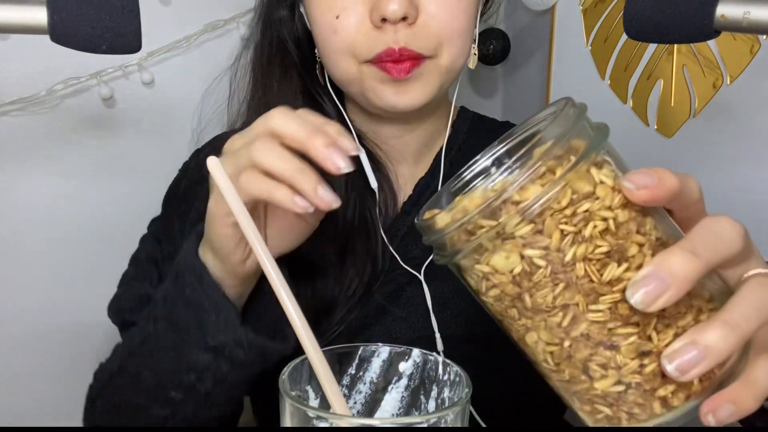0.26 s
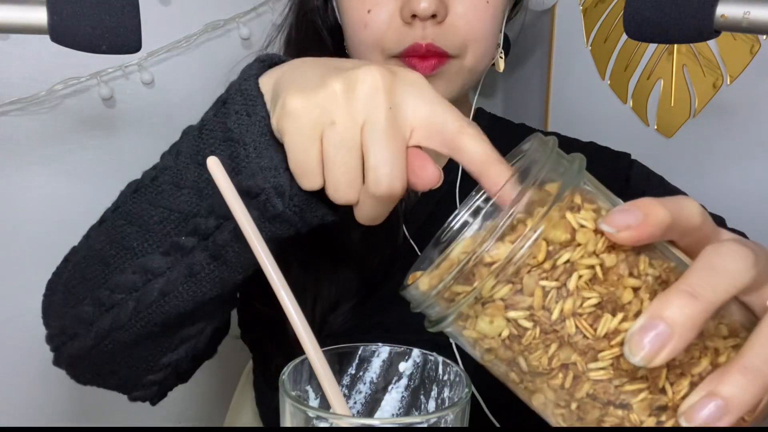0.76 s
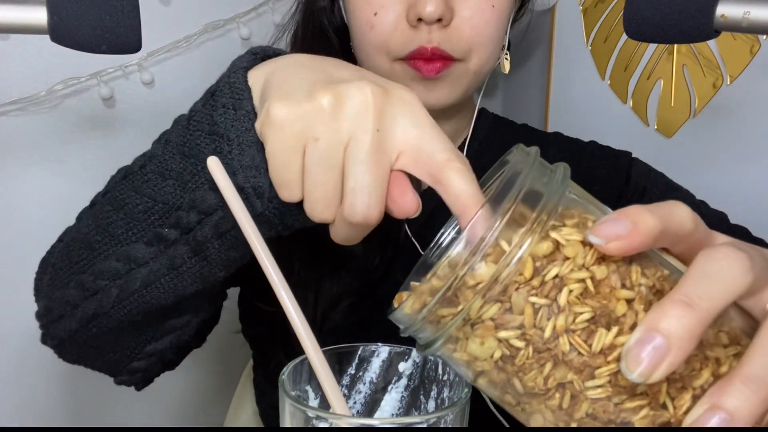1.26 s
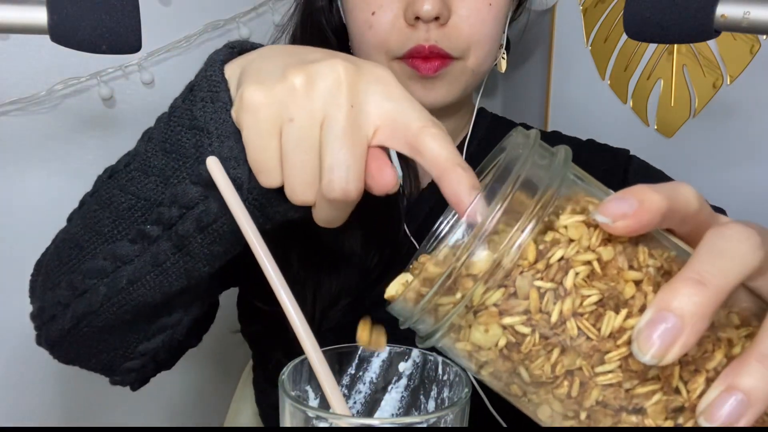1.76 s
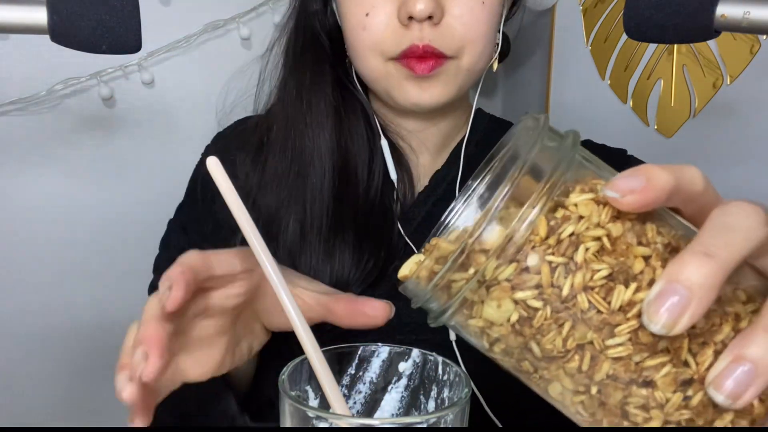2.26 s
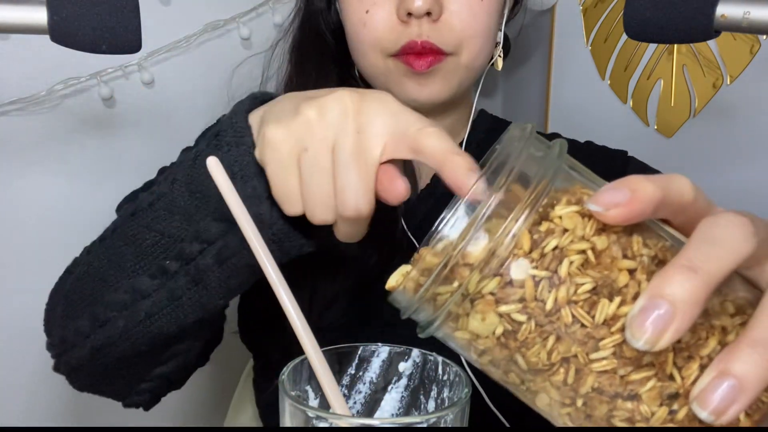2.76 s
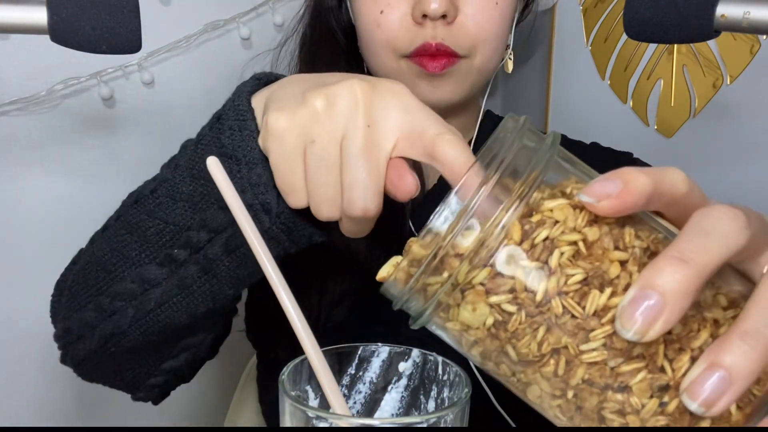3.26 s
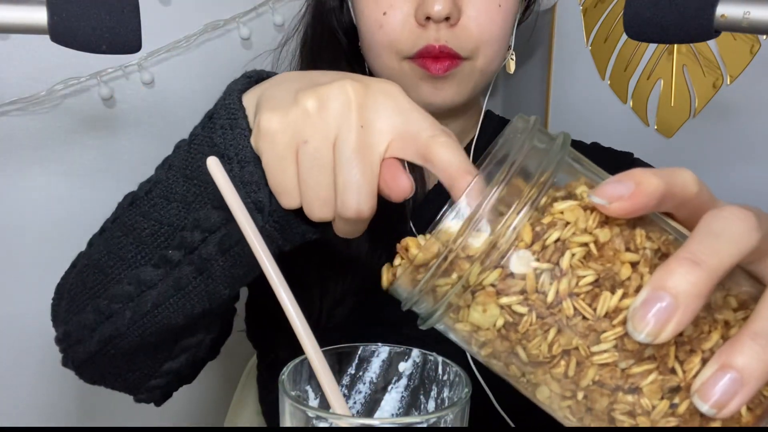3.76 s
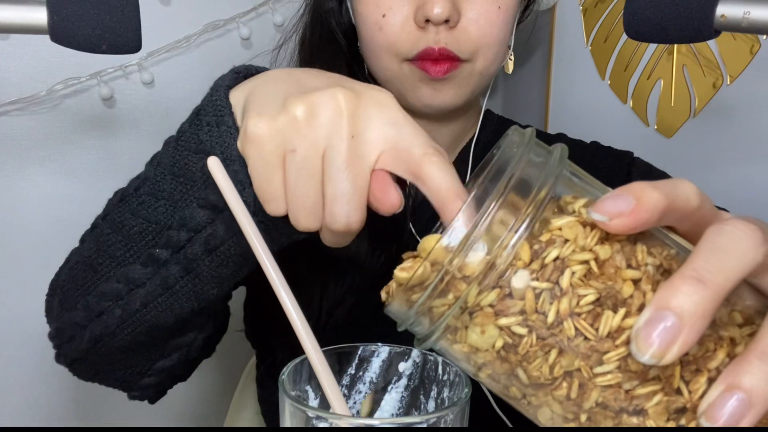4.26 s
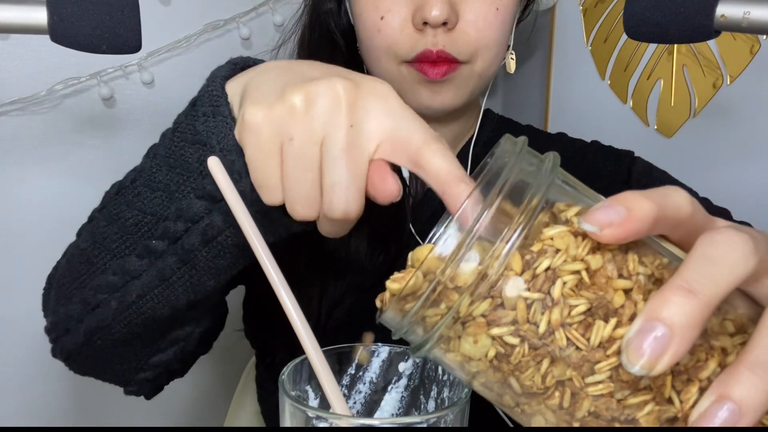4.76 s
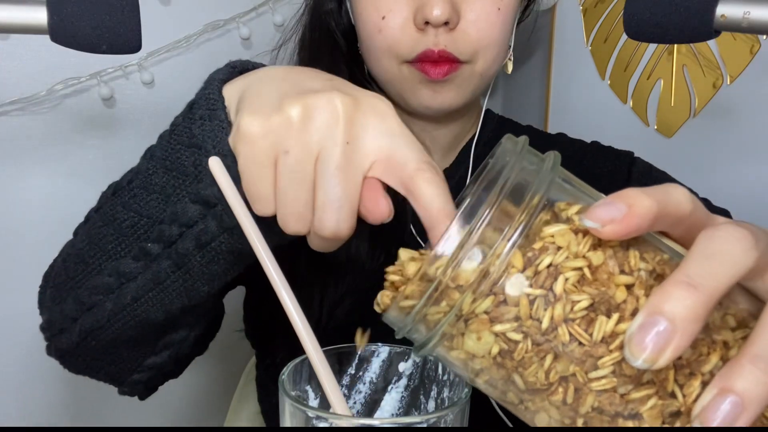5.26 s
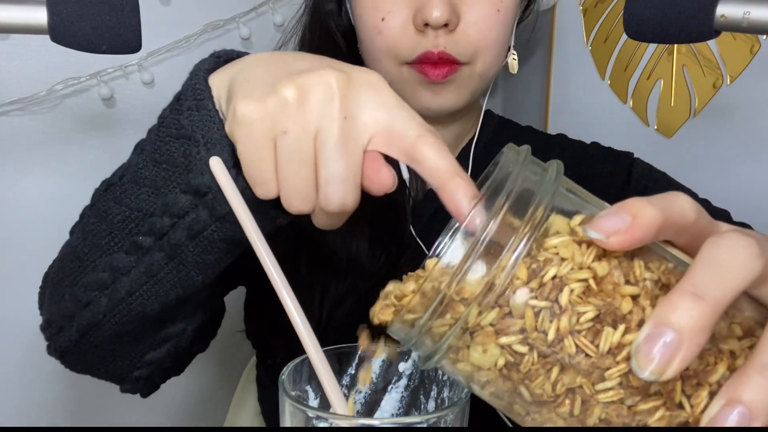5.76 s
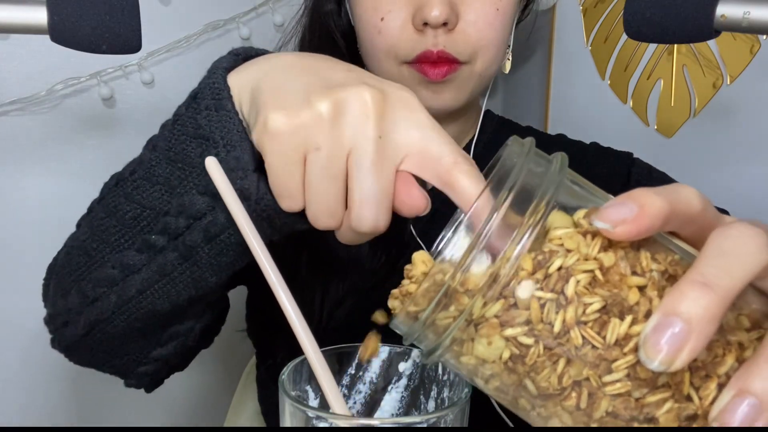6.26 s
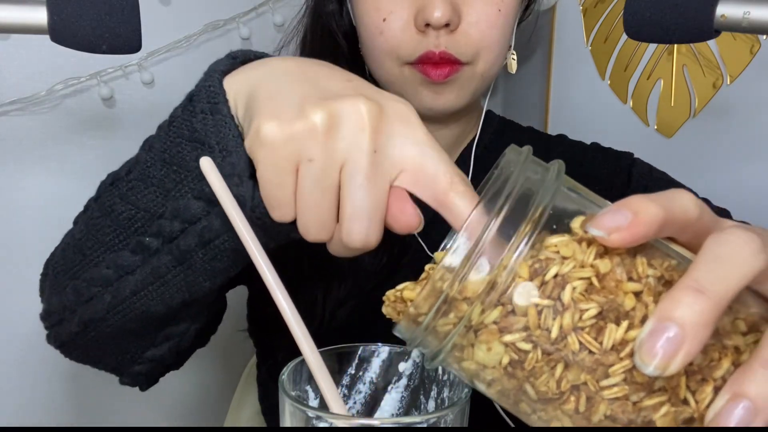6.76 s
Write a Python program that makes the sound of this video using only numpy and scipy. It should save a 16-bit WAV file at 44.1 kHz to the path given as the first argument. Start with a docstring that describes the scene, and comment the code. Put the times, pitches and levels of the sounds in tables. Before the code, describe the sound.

Close, quiet granola raking: soft swishes and a sudden table thud, then thickening crackly crunch and glassy clinks as kernels spill into a tumbler.

```python
"""Raking granola from a jar into a tumbler

A finger rakes granola out of a tilted glass jar into a thick tumbler, close to a pair of microphones.
Shaped noise and tiny pings make the rubbing kernels; hollow noise makes the jar mouth and swishing sleeve.
Decaying tones make the clinks in the tumbler; short bursts make the crunches and ticks.
Clusters thud as wavering table tones with a crack, the hardest overloading the input.
Filtered noise makes the room's rumble, hiss and slow puffs of air."""
import sys
import numpy as np
from scipy import signal
from scipy.fft import rfft, irfft, next_fast_len
from scipy.io import wavfile
from scipy.ndimage import uniform_filter1d

SR = 44100
rng = np.random.default_rng(int(sys.argv[2]) if len(sys.argv) > 2 else 0)


def materialize(psi):
    """Save the field psi as 16-bit PCM at rate SR to the path in sys.argv[1].

    A 1-D psi becomes a single channel; in a 2-D psi each row is a channel.
    """
    bounded = np.clip(np.atleast_2d(psi).T, -1, 1)
    quanta = np.round(bounded * 32767).astype(np.int16)
    wavfile.write(sys.argv[1], SR, quanta)


def volts(x):
    """Linear amplitude factor 10**(x/20) for a level x in dB, scalar or array-like."""
    e = np.asarray(x, float) / 20
    return 10 ** e


N = 308700  # length in samples: 7 seconds

# Ringing tones of the tumbler, with levels relative to each other.
# t60_s is the time to fade by 60 dB; mode_group (rounded) is 0 second, 1 first, 2 third, 3 or -1 top.
# Columns: pitch_hz, level_db, t60_s, mode_group, left_right_db, left_lead_rad
TUMBLER = [(2055, 0.5, 0.15, 1, 5.5, 0.92), (4904, 2.5, 0.043, 0, 5.5, 0.8),
           (4700, -14.5, 0.089, 1.5, 0.5, 1.95), (8640, 8, 0.052, 2, 1.5, 2.52),
           (10366, 5.5, 0.028, 3, -1, 1.2), (11680, -2, 0.033, 3, -2.5, 1.3),
           (12000, -6, 0.018, 3, -9, 0.92), (13400, -6.5, 0.024, 3, -6.5, 1.7),
           (14900, -14.5, .02, 3, -4.5, 1.3), (2055, -13, 0.27, 1, 3.5, 1.4),
           (1779, -2.5, 0.03, 2.5, -2.5, 0.71), (3720, -30, 0.083, -1, -4.5, 2.2),
           (6100, -12, 0.072, 2, 0.5, 1.2), (8000, -6.5, 0.04, 2, -1.5, 1.2)]

# Strokes of finger and sleeve, with relative levels; middle_db is added to rustle_db for its middle pitches.
# Columns: full_strength_s, held_s, rustle_db, middle_db, hollow_db
STROKES = [(.1, 0.14, -67.5, -7, -55.5), (.62, 0.037, -73, -3, -46), (.69, 0.17, -58.5, -1.5, -44.5),
           (.97, .04, -56.5, -4, -43.5), (1.06, 0.18, -55, -2.5, -45), (1.31, 0.021, -55, 0, -46),
           (1.484, 0.039, -57, 8, -45.5), (1.66, .01, -68.5, 0, -53.5), (1.88, .01, -66.5, -10.5, -62.5),
           (2.073, .03, -63, 4.5, -33), (2.53, 0.11, -74.5, 2.5, -57), (2.867, 0.044, -58, -2.5, -46.5),
           (2.974, .01, -61.5, -2.5, -50.5), (3.17, 0.029, -55.5, 1.5, -43),
           (3.382, 0.032, -55.5, 2, -43.5), (3.46, 0.02, -64, 9, -63), (3.592, 0.0166, -53.5, -0.5, -41.5),
           (3.706, .01, -42.5, -7, -48), (3.891, .055, -54, -3.5, -43.5), (4.141, .01, -57, 10, -40),
           (4.21, 0.035, -44.5, -0.5, -46), (4.33, .02, -60, -7, -53.5), (4.46, 0.07, -45, .1, -42),
           (4.701, .01, -57, -2, -68), (4.82, 0.049, -48, -3.5, -46), (5.031, .01, -61, 11, -38),
           (5.085, 0.12, -41, -7, -42), (5.29, 0.093, -48.5, -5, -54), (5.475, 0.024, -35, -1.5, -36.5),
           (5.579, 0.039, -47.5, -2.5, -51), (5.815, 0.076, -37.5, -2, -42.5), (5.95, 0.034, -49, 1, -42.5),
           (6.11, 0.025, -37, -5, -43.5), (6.258, 0.13, -36.5, -1, -41), (6.53, 0.028, -39, 0.7, -56),
           (6.62, 0.043, -39, -4.5, -45), (6.789, .01, -51.5, 4.5, -42.5), (6.86, 0.0058, -43, 1, -53),
           (6.99, .01, -29, -6, -44)]


def unit(x):
    """Scale a sound to an average strength (rms) of 1."""
    return x / np.sqrt(np.mean(x ** 2) + 1e-20)


def along(points, hz):
    """Read a curve of (Hz, value) points, with frequency on a log axis."""
    point_hz, value = np.transpose(points)
    return np.interp(np.log(hz + 1), np.log(point_hz + 1), value)


def filtered(x, response):
    """Change the strength and timing of each frequency by a response function."""
    length = next_fast_len(x.shape[-1] + 8192)  # spare room so the end does not wrap to the start
    spectrum = rfft(x, length) * response(np.fft.rfftfreq(length, 1 / SR))
    return irfft(spectrum, length)[..., :N]


def peak(f, hz, width_hz):
    """The response of one resonance, which rings on after it is struck."""
    return 1j * f * width_hz / (hz * hz - f * f + 1j * f * width_hz)


def pair(a, b, alike, spectrum):
    """Colour two noises and mix them to stereo of rms 1, with a chosen left-right likeness."""
    def response(hz):
        turn = np.arccos(np.clip(along(alike, hz), -1, 1)) / 2
        return volts(along(spectrum, hz)) * [np.cos(turn), np.sin(turn)]

    mid, side = filtered(np.array([a, b]), response)
    return unit(np.array([mid + side, mid - side]))


def spaced(x):
    """Delay the left side: its capsule is a little further from the jar."""
    lag = 7  # samples
    return np.array([np.pad(x[0], (lag, 0))[:N], x[1]])


def add(out, s, sound):
    """Mix a short sound in at time s, in seconds."""
    start = round(s * SR)
    out[..., start:start + sound.shape[-1]] += sound


def rake():
    """Kernels rub in dense uneven grains and stir the glass; jar mouth and sleeve sound hollow."""
    # Rustle colour: pitch_hz, level_db (per Hz)
    rustle_colour = [(500, -29), (800, -13.5), (1150, 0.5), (1500, -7), (2200, -2), (3000, -1.5),
                     (4500, -2.5), (7000, -3.5), (10000, -4), (13000, -10), (15500, -16.5)]
    # Jar mouth and sleeve colour: pitch_hz, level_db (per Hz)
    hollow_colour = [(120, -26.5), (200, -15.5), (285, -0.5), (380, -4.5), (490, 1), (600, -5),
                     (800, -14.5), (1500, -20.5), (3000, -28), (5000, -48.5)]
    rustle_db, middle_db, hollow_db = raking()
    busy = np.clip((rustle_db + 60.5) / 16, 0, 1)  # harder raking breaks into separate crackles

    slow_noise = unit(uniform_filter1d(rng.standard_normal(N), size=120))
    clumps = volts((2.5 + 1.7 * busy) * slow_noise)
    grains = volts(0.61 * rng.exponential(size=(2, N))) * rng.standard_normal((2, N))
    grains = pair(*grains, [(1000, 0.25), (8000, 0.08)], rustle_colour)
    rustle = clumps * grains * volts(rustle_db + 10 - 3.8 * busy)
    middle = filtered(rustle, lambda f: 1 / (1 + (f / 4400) ** 6))
    rustle = rustle + middle * (volts(middle_db) - 1)

    def glass(f):
        tumbler = sum(volts(3.5) * peak(f, hz, 0.82 / t60) for hz, _, t60, *_ in TUMBLER)
        jar = volts(5) * peak(f, 2236, 140)
        return tumbler + jar

    stirred = filtered(rustle, glass)
    crackles = crackle(rustle_db - 7 + 8 * busy)
    hollow = pair(*rng.standard_normal((2, N)), [(300, 0.69)], hollow_colour) * volts(hollow_db)
    return spaced(rustle + stirred + crackles) + hollow * volts([[1.2], [-1.2]])  # hollow leans left


def raking():
    """Level curves of the rustle, of its middle above that, and of the hollow sound."""
    rustle, middle, hollow = np.transpose(STROKES)[2:]
    rule = dict(rise_s=0.068, fall_db_per_s=152, rest_db=-73)
    rustle_db = strokes(rustle, **rule)
    middle_db = strokes(rustle + middle, **rule) - rustle_db
    hollow_db = strokes(hollow, rise_s=0.085, fall_db_per_s=189, rest_db=-63.5)
    return rustle_db, middle_db, hollow_db


def strokes(level_db, rise_s, fall_db_per_s, rest_db):
    """Level in dB of strokes that rise, hold and fall, over a faint constant stir."""
    s, held = np.transpose(STROKES)[:2, :, None]
    t = np.arange(0, N, 64) / SR  # a coarse clock is enough
    rise_db_per_s = np.maximum(level_db[:, None] - rest_db, 6) / rise_s
    rise_db = rise_db_per_s * np.maximum(s - t, 0)
    fall_db = fall_db_per_s * np.maximum(t - s - held, 0)
    shape_db = level_db[:, None] - rise_db - fall_db
    total_db = 10 * np.log10(volts(2 * shape_db).sum(0) + volts(2 * rest_db))
    return np.interp(np.arange(N) / SR, t, total_db)


def crackle(level_db, count=1900):
    """Small kernels knock each other: brief pings of random pitch, size and place that follow the raking."""
    t = np.arange(SR // 70) / SR
    when, size, cycles = rng.random((3, count, 1))
    pitch, place = rng.standard_normal((2, count, 1))
    hz = np.clip(4200 * np.exp(.7 * pitch), 1500, 14000)
    start = (when * N).astype(int)
    ping = np.sin(2 * np.pi * hz * t) * np.exp(-t * hz / (3 + 9 * cycles))
    ping = ping * volts(level_db[start] - 3.96 * np.log(size + 0.0013))  # a few are much louder
    where = (start + np.arange(len(t))).ravel()
    sides = []
    for side in (1, -1):
        panned = ping * volts(side * 4.2 * place)
        sides.append(np.bincount(where, panned.ravel(), N + SR)[:N])
    return np.array(sides)


def clinks():
    """Each kernel rings the tumbler's tones in its own mixture; each tone faces the capsules differently."""
    # Kernels landing in the tumbler, with relative levels; the last three are added to second_mode_db.
    # Columns: start_s, second_mode_db, first_mode_db, third_mode_db, top_modes_db
    kernel_landings = [(1.0854, -18.5, 1.5, 0, -12), (1.6424, -50.5, 16, -10.5, -7.5),
                       (3.678, -24.5, -8.5, -13, -0.5), (3.7554, -24.5, -28, -9, -3),
                       (4.1134, -20, -22, -6, -9.5), (4.1215, -23, -11, -32, -28),
                       (4.2064, -30.5, -6, -16, 4), (4.2522, -23.5, -6.5, -21, -6),
                       (4.2814, -25.5, -38, -14, -1.5), (4.364, -20, -30, -12, -4.5),
                       (4.3684, -17, -29, -23, -11), (4.4064, -28, -24.5, -5, 0.5),
                       (4.4453, -20.5, -18, -4, -1.5), (4.4717, -14, -35, -26, -10),
                       (4.5204, -30, -26, -12, 10), (4.5301, -19, -25, -18, -15),
                       (4.5655, -26, -23, -22, -11), (4.5864, -29, -19, -5, 5.5),
                       (4.6438, -40, -20, -3, 15.5), (4.6887, -28.5, -15.5, -8, -6),
                       (4.7032, -21.5, -33, -8, -4.5), (5.005, -4, -6, -41, -33),
                       (5.0314, -31.5, 2, -11, -7), (5.0853, -23, 3.5, -5, -3),
                       (5.1557, 2.5, -26.5, -24.5, -31), (5.1624, -5, -27, -10, -20),
                       (5.233, -15.5, -34, -15, -13), (5.2494, -22.5, -14.5, -22, -24),
                       (5.3068, -30.5, -10.5, -12, 6.5), (5.4276, -24.5, -36, -5, -5),
                       (5.4445, -17, -27, -8, -15), (5.4584, -5, -33, -28, -27),
                       (5.4615, -1, -29, -21.5, -30), (5.4884, -24.5, -3, -18, -4),
                       (5.5648, -20, -17, -17, -2), (5.6211, -20.5, -32, -28, -14.5),
                       (5.8032, -19.5, -33, -11, -6), (5.8107, -18, -10.5, -21, -3.5),
                       (5.8361, -25, 4.5, -23, -10), (5.8434, -22.5, 2, -23, -13),
                       (5.8534, -19.5, -14, -10, -9), (5.8694, -24, 5, -14, -7),
                       (5.884, -16, -18.5, -20, -8), (5.9004, -21, -31, -9, -3),
                       (5.9104, -24.5, -5, -14, -1), (5.9499, -38, 3, -1, 16),
                       (6.0611, -15, -21.5, -14, -7.5), (6.0651, -12, -44, -15, -23),
                       (6.0866, -18, -16, -10, -13), (6.1379, -23.5, -7.5, -3.5, -2),
                       (6.1988, -21, -12, -8, -5), (6.2312, -8, -30, -11.5, -25),
                       (6.2544, -18.5, -7, -14, 6), (6.2851, -22, -29, -25, -5), (6.3355, -29, -23, 0, -7),
                       (6.3594, -40.5, -4, -6, 17.5), (6.4288, -31.5, -10.5, -4.5, -8),
                       (6.4976, -22.5, -11, -5, -14.5), (6.6139, -28, -3, -14, -7),
                       (6.6388, -32, -6, -7, 11), (6.9331, -23.5, -28, -20, -7),
                       (6.9556, -19.5, -18, -5, -12), (6.9764, -26.5, -13, 2, 1)]
    out, t = np.zeros((2, N + SR)), np.arange(SR // 5) / SR
    hz, mode_db, t60, group, pan_db, lead = np.transpose(TUMBLER)
    group = np.round(group).astype(int)
    side = np.array([.5, -.5])[:, None, None]  # half of each left-right difference per side
    # weak modes depend most on where the kernel lands
    scatter_db = np.minimum(1.2 + 0.52 * np.abs(mode_db), 6)
    landings = [*kernel_landings, *spill()]
    luck = rng.standard_normal((len(landings), 2 * len(hz)))
    for (s, db, *above), chance in zip(landings, luck):
        level_luck, phase_luck = np.split(chance, 2)
        group_db = np.array([0, *above])[group]
        level_db = db + group_db + mode_db + scatter_db * level_luck + 0.5
        turn = 2 * np.pi * hz[:, None] * t + side * (lead + 0.39 * phase_luck)[:, None]
        fade_db = level_db[:, None] + side * pan_db[:, None] - 60 * t / t60[:, None]
        ring = volts(fade_db) * np.sin(turn)
        add(out, s, ring.sum(1) * (1 - np.exp(-t / 0.00086)))  # a very quick, soft start
    return out[:, :N]


def spill(count=40):
    """Once the jar pours, stray kernels drop into the tumbler at random, their levels following the raking."""
    from_s, above_rustle_db, spread_db = 3.4, 8.5, 6.5
    modes_db = [-9.5, -9, 0]  # first, third and top modes above the second, before scatter
    when = from_s + rng.random(count) * (N / SR - from_s)
    chance = spread_db * rng.standard_normal((count, 4))
    rustle_db = raking()[0][(when * SR).astype(int)]
    level_db = rustle_db + above_rustle_db + chance[:, 0] / 2
    return np.column_stack([when, level_db, modes_db + chance[:, 1:]])


def ticks():
    """A snap is a very short burst, bare and through the jar's body; the piece adds a brief pitched ping."""
    # Kernels snapping and ticking on glass, with relative levels; body and ping are added to treble_db.
    # Columns: start_s, treble_db, body_db, ping_db, ping_hz
    snaps = [(0.082, -47, -17, -12, 2800), (0.149, -37, -17, -11, 3540), (.266, -39, -22, -16.5, 2230),
             (0.597, -50, 16.5, -4, 2120), (1.085, -30.5, 3, 18.5, 2750), (1.3952, -44, -19, 11.5, 2315),
             (1.411, -33, -28, -8, 2270), (1.4572, -43.5, -21, 10, 2160), (1.48, -38, -21, 18, 2270),
             (1.64, -40.5, 9.5, -17, 2320), (1.6596, -38, -3.5, -4, 2370), (1.855, -44, -21, -18, 4200),
             (2.846, -54, -20, -12, 2600), (3.342, -41, -15.5, -9, 2200), (3.5418, -38.5, -20, -8.5, 2170),
             (3.679, -13.5, -2, -1, 2920), (3.8279, -41.5, 1, -12, 2160), (3.9, -28.5, 3, -6, 2690),
             (4.0114, -34.5, 0, -6, 2260), (4.115, -23, -5, -5.5, 3720), (4.1724, -31, -2, -1.5, 2290),
             (4.1952, -37, -8, 14.5, 2920), (4.2103, -30.5, 1.5, -1.5, 2970), (4.2405, -31.5, 2, -5, 3060),
             (4.286, -25, -6, -8, 3680), (4.3156, -27.5, -22, -17, 2290), (4.364, -30, -7, -4.5, 2260),
             (4.4224, -27, -11, -14, 2260), (4.445, -27.5, 2, -15.5, 3870), (4.4692, -27, -16, -11.5, 2280),
             (4.527, -22.5, -13, -10, 2220), (4.6892, -32.5, -5, -15, 2900),
             (4.7044, -22.5, -25, -12.5, 2290), (4.8379, -31, -20, -14, 2260),
             (5.0031, -21.5, 10, 2.5, 2290), (5.032, -35, 18, 3.5, 2190), (5.0665, -27, -1, -4, 3870),
             (5.085, -28, 6, 5, 2320), (5.112, -22, -9, -9.5, 2180), (5.1546, -9.5, -11, -3.5, 3600),
             (5.1612, -6.5, -9.5, -11, 3610), (5.2317, -17, -23, -16, 2270), (5.445, -22.5, -7, -8, 2440),
             (5.4597, -18, 0, 4.5, 2360), (5.4885, -29, -8, 4.5, 2300), (5.5152, -19.5, -19, -14.5, 3000),
             (5.5602, -23, -8, -18, 2230), (5.694, -30, -13, -12, 2150), (5.79, -38, 3, -8, 2180),
             (5.8072, -25.5, -6, -2, 3550), (5.8566, -23.5, -0.5, 1, 2130),
             (5.9095, -18.5, -24, -16.5, 2280), (5.9563, -25, -21, -14, 2160),
             (6.0606, -15, -9, -5.5, 2890), (6.103, -19, -20, -22, 3020), (6.1104, -14.5, -10, -22, 2290),
             (6.174, -31.5, 1, -6, 2980), (6.2285, -12.5, -13, -9.5, 3850), (6.2579, -14, -15, -5.5, 3420),
             (6.332, -19.5, -13, -9.5, 3180), (6.4222, -25, -18, 0, 4000), (6.429, -23, -11, -11, 2230),
             (6.4956, -20, -15, -11, 2900), (6.5834, -22, -12, -7, 3180), (6.6144, -26, 0, -1.5, 3020),
             (6.7298, -27.5, -7, -6.5, 3150), (6.8673, -29.5, -22, -2, 2200), (6.9551, -25, -12, -11, 2880),
             (6.9733, -21, -7, -12, 2900)]
    layers, t = np.zeros((3, 2, N + SR)), np.arange(SR // 30) / SR
    for s, db, body_db, ping_db, ping_hz in snaps:
        pan_db = rng.normal(1.7, 7)  # ticks lean left and scatter
        grit = rng.standard_normal((3, len(t)))
        burst = (grit[0] + 0.83 * grit[1:]) * volts(-60 * t / 0.026)  # one shared noise, one per side
        ping = np.sin(2 * np.pi * ping_hz * t) * volts(-60 * t / 0.027) * (1 - np.exp(-t / 0.00041))
        even_burst = burst / np.abs(burst).max()
        parts = np.array([even_burst, even_burst, ping + .5 * burst])
        pan = volts(np.array([[pan_db / 2], [-pan_db / 2]]))
        level_db = db + np.array([10, body_db + 23, ping_db + 8])
        add(layers, s, volts(level_db)[:, None, None] * parts * pan)
    treble = filtered(layers[0], lambda f: peak(f, 7400, 9800) * peak(f, 6170, 11600))
    body = filtered(layers[1], lambda f: peak(f, 1150, 323))
    middle = filtered(layers[2], lambda f: peak(f, 2620, 2000))
    return spaced(treble + body + middle)


def thuds():
    """A falling cluster shakes the table's tones, which waver as the top rattles, and breaks with a crack."""
    # Clusters thudding down, with relative levels; sharpness tilts the tones and lifts the crack.
    # Columns: start_s, level_db, sharpness_db
    falls = [(1.0839, -5.5, -1), (3.6786, -31.5, 2.5), (5.0057, -32, 6), (5.165, -21.5, -1),
             (5.49, -26, -4), (6.258, -30, -1)]
    # Ringing tones of the table top and what stands on it, with relative levels.
    # Columns: pitch_hz, level_db, t60_s
    table_tones = [(144.5, -11.5, 0.21), (218, -12, .13), (269, -3, .14), (338, 2, 0.13), (472.5, -1, 0.13),
                   (524, -9.5, 0.21), (728, 1.1, 0.15), (860, -4, 0.093), (1018, 2.5, 0.069),
                   (1101, 1, 0.15), (1336, -14, .12), (1414, -6.5, 0.15), (1540, -15, .15),
                   (2094, -16, .15), (2290, -15.5, 0.16), (2680, -11.5, .12), (2720, -12.5, .15),
                   (3080, -18.5, .12), (3570, -27.5, .13), (4931, -22, 0.35), (5730, -28, .25)]
    out, t = np.zeros((2, N + SR)), np.arange(SR // 3) / SR
    cracks = np.zeros((2, N + SR))
    hz, mode_db, t60 = np.transpose(table_tones)[:, :, None]
    for s, db, sharp_db in falls:
        tilt_db = sharp_db * np.clip(np.log(hz / 500) / 1.9, -1.5, 1)
        phase = 0.46 * rng.standard_normal((2, len(hz), 1))
        waver = 0.019 * np.cumsum(rng.standard_normal((len(hz), len(t))), axis=1)
        fade = volts(db - 3.5 + mode_db + tilt_db - 60 * t / t60)
        ring = fade * np.sin(2 * np.pi * hz * t + phase + waver)
        add(out, s, ring.sum(1) * (1 - np.exp(-t / 0.00041)))
        grit = rng.standard_normal((3, len(t)))
        fall = volts(-60 * t / 0.043) + volts(-25 - 60 * t / 0.34)  # a quick fade over a weak long one
        add(cracks, s, volts(db + sharp_db + 16.5) * fall * (grit[0] + 1.2 * grit[1:]))

    def colour(f):
        peaks = peak(f, 1200, 700) + volts(-3.5) * peak(f, 2100, 900) + volts(-4.5) * peak(f, 620, 300)
        return peaks / (1 + 1j * f / 3200) ** 2

    def glass(f):
        """The tumbler rattles along: its tones ring inside the crack."""
        return sum(volts(-29.5) * peak(f, tone_hz, 2.2 / fade_s) for tone_hz, _, fade_s, *_ in TUMBLER)

    return spaced(out[:, :N] + filtered(cracks, lambda f: colour(f) + glass(f)))


def room(x):
    """The room answers with fading noise in which each frequency dies at its own speed."""
    # Fading of the room: pitch_hz, t60_s
    room_fade = [(150, 0.46), (1000, 0.26), (4000, 0.27), (12000, 0.17)]
    gap = 200  # samples before the room answers
    hz, t, z = signal.stft(rng.standard_normal((2, SR // 3)), SR, nperseg=256)
    fade = volts(-60 * t / along(room_fade, hz)[:, None])
    tail = signal.istft(z * fade, SR, nperseg=256)[1]
    tail = tail / np.linalg.norm(tail[0])
    late = np.pad(x.mean(0), (gap, 0))[None]
    return signal.fftconvolve(late, tail, axes=1)[:, :N]


def room_tone():
    """Building rumble and hiss are steady noise; slow puffs of air are noise near or below hearing."""
    # Room tone colour: pitch_hz, level_db (per Hz, relative)
    tone_colour = [(15, -22.5), (31, -15), (41, 1), (50, -10.5), (62, -9), (80, -14), (105, -19.5),
                   (150, -24), (250, -26.5), (500, -38.5), (1000, -41), (2000, -45.5), (8000, -53.5),
                   (15500, -68)]
    # Room tone stereo: pitch_hz, left_right_likeness (1 is the same on both sides)
    tone_likeness = [(40, 0.74), (300, 0.21), (2000, 0.13), (10000, 0.091)]
    # Slow air movement on the capsules: time_s, level_db (before each capsule's exposure)
    air_level = [(0.0, -47), (0.21, -38), (0.45, -46), (1.15, -35), (1.56, -45), (1.97, -30), (2.4, -43),
                 (2.51, -22), (2.83, -48), (3.39, -39), (3.61, -45), (3.67, -43), (6.9, -40), (7.0, -49.5)]
    tone = pair(*rng.standard_normal((2, N)), tone_likeness, tone_colour) * volts(-40)
    puff_colour = [(4, -18), (10, -1), (24, -12), (36, -36), (60, -120)]  # (Hz, dB per Hz)
    puffs = pair(*rng.standard_normal((2, N)), [(20, 0.77)], puff_colour)
    air_s, air_db = np.transpose(air_level)
    puff_db = np.interp(np.arange(N) / SR, air_s, air_db)
    return tone + puffs * volts(puff_db + [[5], [-3]])  # the left capsule is more exposed


def scene():
    """All the near sounds, the room's answer to the hits and thuds, and the room tone."""
    hits = clinks() + ticks()
    knocks = thuds()
    answer = room(volts(-14) * hits + volts(-6.5) * knocks)
    return hits + knocks + rake() + answer + room_tone()


def band_limit(x):
    """A steep low-pass at the top of the band."""
    return signal.sosfilt(signal.butter(12, 15670, fs=SR, output="sos"), x)


def record(dry):
    """The overloaded input flattens peaks hard at full scale."""
    clipped = dry / (1 + np.abs(dry) ** 14) ** (1 / 14)
    return band_limit(clipped)


dry = scene()
out = record(dry)
materialize(out)
```